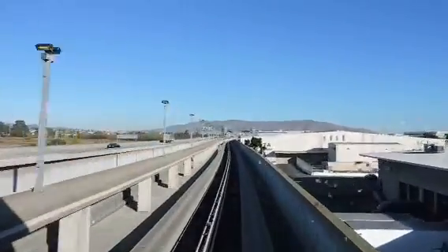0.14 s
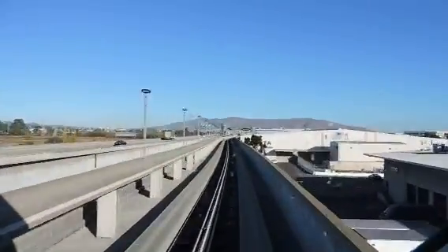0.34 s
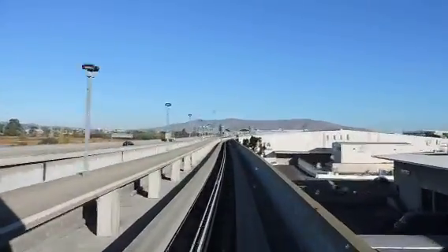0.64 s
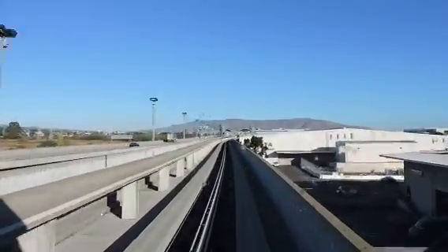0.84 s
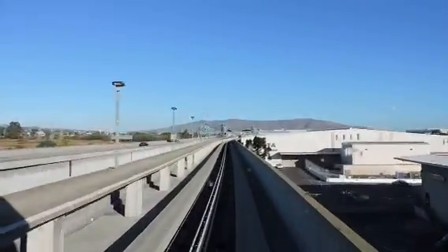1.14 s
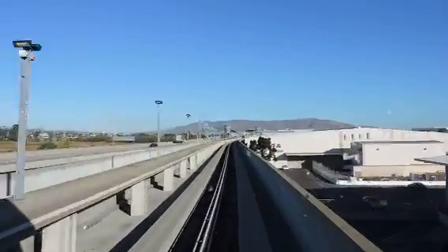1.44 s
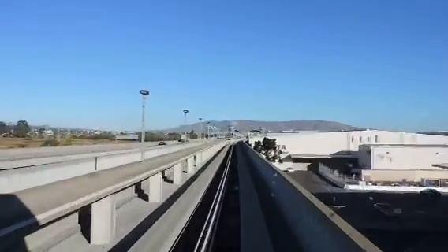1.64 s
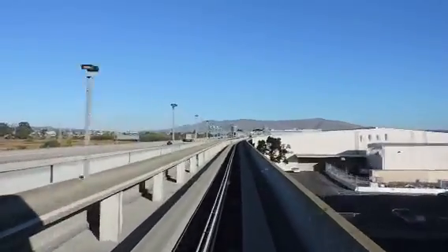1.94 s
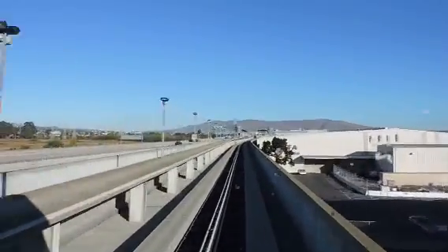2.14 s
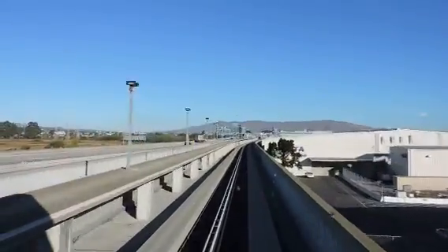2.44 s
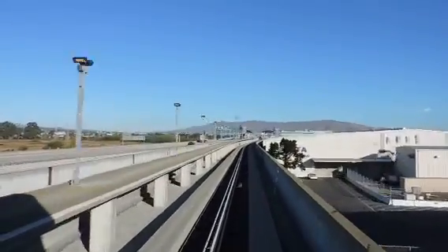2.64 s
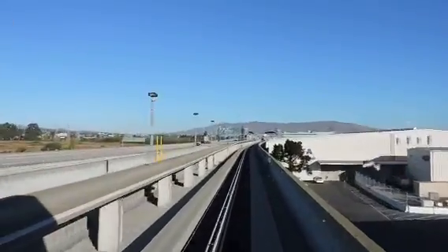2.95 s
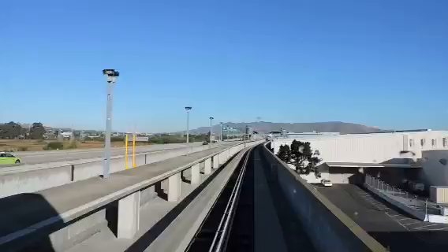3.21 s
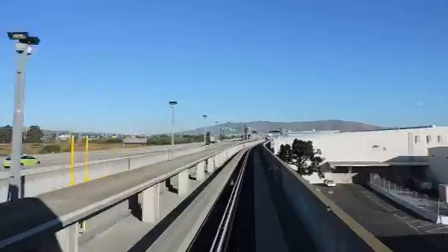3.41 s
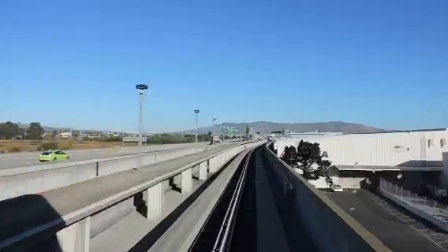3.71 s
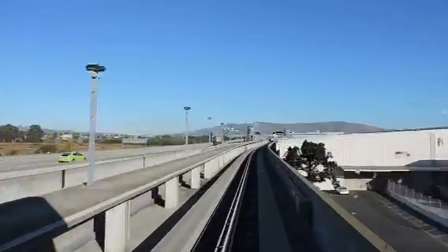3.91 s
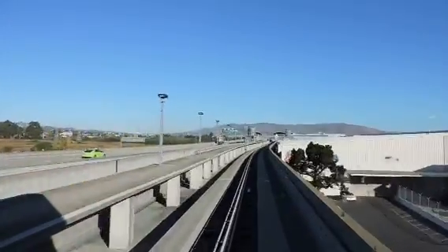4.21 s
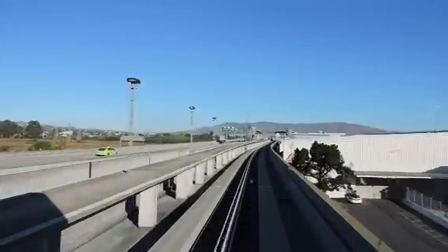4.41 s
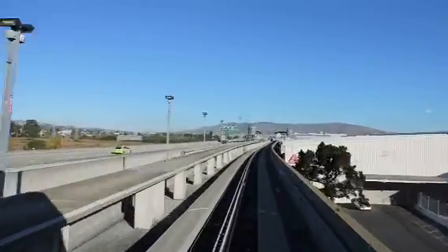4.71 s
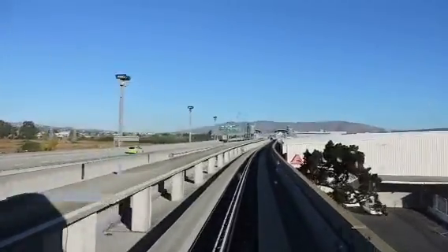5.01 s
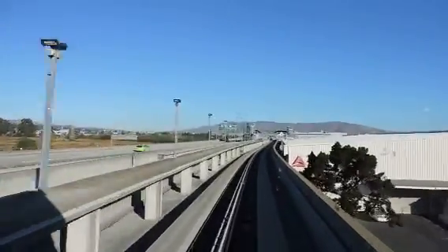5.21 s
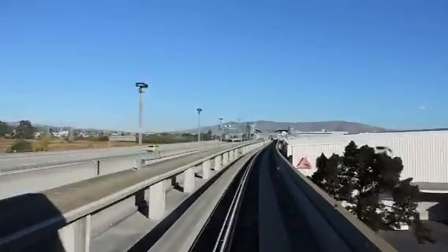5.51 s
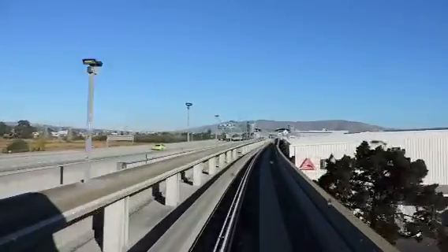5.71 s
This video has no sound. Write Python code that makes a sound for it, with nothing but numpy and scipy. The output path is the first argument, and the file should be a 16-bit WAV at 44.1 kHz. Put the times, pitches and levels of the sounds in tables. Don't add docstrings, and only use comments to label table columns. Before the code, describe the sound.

Heard inside a moving automated car on a concrete guideway: a steady bassy rumble with irregular bumps, floor drone and soft tyre roar. A small fitting clicks early on. From about two seconds a mid-pitched motor whine emerges, wavering and briefly dropping out. A hard knock lands near four seconds, another near four and a half. Stereo microphone in the cabin, bass fuller on the left, treble diffuse.

```python
import sys
import numpy as np
from scipy import signal
from scipy.fft import rfft, irfft, next_fast_len
from scipy.io import wavfile
from scipy.ndimage import uniform_filter1d

SR = 44100
rng = np.random.default_rng(int(sys.argv[2]) if len(sys.argv) > 2 else 0)


def to_wav(sig):
    pcm = np.clip(np.atleast_2d(sig), -1, 1) * 32767
    pcm = np.round(pcm).astype(np.int16)
    wavfile.write(sys.argv[1], SR, pcm.T)


def rack_gain(trim_db):
    fader = np.asarray(trim_db, float)
    return 10 ** (fader / 20)


N = 258413
MEAN_ROUGH_DB = -41
CONTACT_S = 0.001
STRUCK_LIKENESS = 0.3


def rms_one(x):
    return x / np.sqrt(np.mean(x ** 2) + 1e-20)


def in_time(rows):
    s, *columns = np.transpose(rows)
    return [np.interp(np.arange(N) / SR, s, c) for c in columns]


def at_hz(points, hz):
    point_hz, point_db = np.transpose(points)
    return np.interp(np.log(hz), np.log(point_hz), point_db)


def sides(pan_db):
    return rack_gain(np.array([pan_db / 2, -pan_db / 2]))


def drift(rate_hz):
    pole = np.exp(-80 * np.pi * rate_hz / SR)
    noise = rng.standard_normal(N // 40 + 2002)
    slow = signal.lfilter([1], [1, -2 * pole, pole * pole], noise)[2000:]
    return np.interp(np.arange(N) / 40, np.arange(len(slow)), rms_one(slow))


def swells(rows, width_s=None):
    t = np.arange(0, N / SR + .004, .002)
    rise_db = np.zeros(len(t))
    for s, peak_db, *own_s in rows:
        bell_s = own_s[0] if own_s else width_s
        rise_db += peak_db * np.exp(-((t - s) / bell_s) ** 2)
    return np.interp(np.arange(N) / SR, t, rise_db)


def cabin_noise(spectrum, shared_db, own_db, rate_hz, count):
    # (frequency [Hz], left-right likeness [-1..1])
    likeness = [(20, 1), (130, 1), (290, 0.94), (640, 0.89), (1410, 0.61), (3100, 0.1), (6820, -0.074),
                (15000, -0.15)]
    # (frequency [Hz], left-right difference [dB])
    lean = [(60, 2.5), (300, 0.3), (700, 2.5), (1400, 0.5), (4400, 1.4), (9000, 1), (15000, 0.5)]
    size = next_fast_len(N)
    hz = np.maximum(np.arange(size // 2 + 1) * SR / size, 1)
    mid, side = rfft(rng.standard_normal((2, size)))
    alike = np.clip(at_hz(likeness, hz), -1, 1)
    mid = np.sqrt(1 + alike) * mid
    side = np.sqrt(1 - alike) * side
    pair = np.array([mid + side, mid - side])
    pair = pair * rack_gain(at_hz(spectrum, hz)) * sides(at_hz(lean, hz))
    low_hz, high_hz = spectrum[0][0], spectrum[-1][0]
    place = np.log(hz / low_hz) / np.log(high_hz / low_hz) * count
    pair = pair * ((place > 0) & (place < count))
    together, out = drift(rate_hz), 0
    for k in range(count + 1):
        band = irfft(pair * np.clip(1 - abs(place - k), 0, 1), size)[:, :N]
        out = out + band * rack_gain(shared_db * together + own_db * drift(rate_hz))
    return out / np.sqrt(np.mean(out.mean(0) ** 2))


def evened(x, span_s):
    size = round(span_s * SR)
    power = uniform_filter1d(x.mean(0) ** 2, size=size)
    return x / np.sqrt(uniform_filter1d(power, size=size) + 0.021)


def tone(phase, wobble_db, blur_rad, lead_rad=0.0, spread_rad=0.49):
    common = phase + blur_rad * drift(7.6)
    apart = lead_rad + spread_rad * drift(1.16)
    return np.sqrt(2) * np.sin([common + apart / 2, common - apart / 2]) * rack_gain(wobble_db * drift(45.0))


def ride():
    # (time [s], level [dB])
    rough = [(0, -35), (.3, -40.5), (.75, -38.5), (1.15, -42), (1.45, -38.5), (1.8, -41.5), (2.4, -41),
             (2.7, -39.5), (3.2, -40.5), (3.45, -40.5), (4.2, -40.5), (4.75, -41), (4.95, -37), (5.55, -38),
             (5.86, -39.5)]
    # (time [s], low shell [dB], upper shell [dB], floor [dB], rattle [dB])
    jolts = [(.02, -2, 5, -3, 0.5), (.12, -2, -4, -1.5, 2), (.22, 3, 2.5, -0.5, 2), (.45, 6, 7.5, 0, 2),
             (.68, 9, 5, 2, 5), (.8, 6, 6.5, 0.5, 3), (.96, -8, 4.5, -3, 0.5), (1.09, 7.5, 6.5, -1.5, 3),
             (1.22, 4.5, -0.5, -2, 1), (1.33, -1, 7, 1.5, 4), (1.42, -6, 7.5, 0.5, 4),
             (1.57, 1, 8.5, -0.5, 3.5), (1.7, 6, 2, -1.5, 0.5), (1.8, -0.5, 3, -1.5, 1.5),
             (1.92, 3, 1, -0.5, 2.5), (2.07, 7, 5, 1, 0.5), (2.3, 0.5, 3.5, -0.6, 0),
             (2.47, 3, 6, -0.5, -1.5), (2.6, 0, 7, 1.5, 2), (2.679, 6, 4.5, 0, 2), (2.88, -2, -2, 0, 1),
             (3.08, 6, 4.5, 1.5, 3.5), (3.19, 5, 7.5, 2.5, 2.5), (3.3, -5, 4, 0, 2), (3.53, -9, 9, 0, 2),
             (3.66, -6, -3, -0.5, 0), (3.75, -1, 3.5, 2, 9), (3.989, -4, 6, 3, 5),
             (4.14, 5, -0.5, -0.2, 1.5), (4.38, 10, 6, 3.5, 6), (4.56, -4, -7, 0, -0.5),
             (4.852, 6, 0, 1.5, 0.5), (5.0, 8, 0.5, 0, 4), (5.15, 5, 3.5, -0.5, 0.5), (5.3, 9.5, -1, -1, 2),
             (5.6, 7, 5, 0, 0.5), (5.78, 7, 7, -0.5, -1)]
    widths_s = 0.037, 0.047, 0.048, 0.055
    s, *rises = np.transpose(jolts)
    return in_time(rough)[0] - MEAN_ROUGH_DB, *[swells(zip(s, r), w_s) for r, w_s in zip(rises, widths_s)]


def pitching():
    # (frequency [Hz], density [dB per Hz])
    nod_spectrum = [(20, -19), (26, -1), (32, 1), (37, -6.5), (43, -28)]
    return rack_gain(-35) * evened(cabin_noise(nod_spectrum, .3, .3, 4.0, count=1), .12)


def sway():
    # (frequency [Hz], density [dB per Hz])
    sway_spectrum = [(6, -1), (14, -1), (22, -4), (27, -7), (33, -8), (38, -17), (42, -18)]
    # (time [s], level [dB])
    rocking = [(0, -15), (.2, -19.5), (.55, -22.5), (.88, -13.5), (1.1, -25), (1.55, -15), (1.75, -25.5),
               (1.92, -17.5), (2.3, -22), (2.5, -23), (3.2, -19.5), (3.95, -22.5), (4.4, -23.5), (4.6, -26),
               (5.1, -25.5), (5.45, -29.5), (5.7, -14), (5.86, -32)]
    return rack_gain(in_time(rocking)[0]) * evened(cabin_noise(sway_spectrum, 0.26, .3, 3.9, count=1), 0.71)


def trim_hiss(rough_db, rattle_db):
    # (frequency [Hz], density [dB per Hz])
    hiss_spectrum = [(2650, -1.5), (4500, -4), (5800, -7.5), (7830, -10), (9870, -12), (13800, -15),
                     (15100, -18), (15900, -21)]
    level_db = -65.5 + 0.4 * rough_db + rattle_db
    return rack_gain(level_db) * evened(cabin_noise(hiss_spectrum, 0.98, .6, 30.0, count=3), 0.11)


def floor_drone(rough_db, floor_db):
    # (frequency [Hz], density [dB per Hz])
    drone_spectrum = [(97, -54), (165, -10), (200, -11), (237, -5), (313, -8.5), (338, -13), (371, -9),
                      (398, -19), (430, -13.5), (455, -16), (489, -6), (521, -16), (544, -13), (900, -21),
                      (1170, -25.5), (1980, -120)]
    level_db = -34 + 0.87 * rough_db + floor_db
    return rack_gain(level_db) * evened(cabin_noise(drone_spectrum, 0.37, 1.9, 37.0, count=4), 0.1)


def tyre_roar(rough_db, floor_db):
    # (frequency [Hz], density [dB per Hz])
    roar_spectrum = [(500, -6), (850, -7.5), (905, -13), (960, -5.5), (1150, -2.5), (1310, -6),
                     (1740, -9.5), (2360, -20), (3240, -24), (3480, -23), (3640, -26), (6500, -45.5),
                     (8450, -73), (14300, -120)]
    level_db = MEAN_ROUGH_DB + rough_db + 0.78 * floor_db
    return rack_gain(level_db) * evened(cabin_noise(roar_spectrum, 0.91, 0.36, 22.0, count=3), 0.17)


def shell_boom(rough_db, shell_db, upper_db):
    # (frequency [Hz], density [dB per Hz])
    boom_spectrum = [(22, -19), (32, -14.5), (42, -12.5), (52, 1.5), (61, 0), (75, -2.5), (88, -4),
                     (105, -13.5), (125, -41)]
    # (frequency [Hz], density [dB per Hz])
    thump_spectrum = [(65, -48), (80, -5), (95, 0), (118, 4), (140, -4.5), (165, -25), (210, -66)]
    boom_db = -28.5 + 0.35 * rough_db + shell_db
    thump_db = -30.5 + 0.33 * rough_db + upper_db
    boom = rack_gain(boom_db) * evened(cabin_noise(boom_spectrum, 0.2, 0.43, 5.5, count=1), 0.043)
    thump = rack_gain(thump_db) * evened(cabin_noise(thump_spectrum, 0.31, 0.24, 7.8, count=1), 0.068)
    return boom + thump


def squeaks():
    # (time [s], length [s], pitch [Hz], level [dB], overtone [dB])
    slips = [
        (1.562, .028, 3180, -52, -15),
        (1.588, .024, 3180, -50, -22),
        (1.61, .025, 3180, -60, -24),
        (1.96, .015, 8400, -66, -40),
        (3.666, .06, 13500, -61, -40),
        (3.68, .025, 12250, -67, -40),
        (4.341, .018, 11500, -59, -40),
        (4.345, .02, 14400, -69, -40),
    ]
    out = np.zeros((2, N))
    for s, length_s, pitch_hz, level_db, overtone_db in slips:
        t = np.arange(round(length_s * SR)) / SR
        beat_db = 2.0 * np.sin(2 * np.pi * 110 * t)
        shape = np.sin(np.pi * (t / length_s) ** .6) * rack_gain(level_db + beat_db)
        steps = rng.standard_normal((2, round(.06 * SR)))
        wander = np.cumsum(steps, axis=1)[:, :len(t)] * .05 * (pitch_hz / 9000) ** 2
        phase = 2 * np.pi * pitch_hz * t + wander
        overtones = rack_gain(overtone_db) * (np.sin(2 * phase) + .15 * np.sin(3 * phase))
        sound = np.sin(phase) + (pitch_hz < SR / 8) * overtones
        at = round(s * SR)
        out[:, at:at + len(t)] += np.sqrt(2) * sound * shape
    return out


def ticks():
    # (frequency [Hz], density [dB per Hz])
    crack_spectrum = [(1000, -3), (1800, -2), (3000, -5), (4800, -4), (6500, -5), (8500, -1.5), (12000, 0),
                      (14000, -2), (15200, -7), (16000, -16)]
    # (time [s], peak [dB], decay [s], left-right [dB], thud below 5 kHz [dB])
    fittings = [(0.0015, -57, 0.0089, -2, 5), (0.641, -39, 0.012, -4, 10), (0.6818, -52, 0.008, -2, -4),
                (0.6865, -54, 0.01, -3, -8), (0.696, -58, .01, 0, 4), (0.756, -58, .01, 0, 3),
                (0.8844, -59, 0.03, 1, 2), (1.8677, -62, 0.01, 1.0, 0.1), (2.5666, -60, .01, 0, 10),
                (2.65, -59, .012, 0, 10), (2.685, -61, 0.0072, 0, 4), (3.014, -64, .01, -2, 10),
                (3.283, -58, 0.04, -2, 0), (3.291, -58, .04, 0, 7), (3.734, -62, 0.02, 1, 4),
                (3.9745, -42.5, 0.004, -7, -9), (3.9748, -36, 0.003, -9, 4.5), (3.9759, -44, .004, -6, 0),
                (4.0036, -54, 0.01, 1, 5), (4.0065, -53, .01, 0, -3), (4.287, -54, 0.014, 4, 5),
                (4.6240, -38, 0.003, -6, 0), (4.6253, -49, .005, -6, 0), (4.665, -54, 0.01, 0, 9),
                (5.3178, -58, .01, 2, 4)]
    thud_late_s, thud_longer, thud_below_hz = 0.001, 1.8, 5000
    tail_db, tail_s, rise_s = -17, 0.16, 0.00013
    t, out = np.arange(round(.08 * SR)) / SR, np.zeros((2, N))
    hz = np.maximum(np.arange(len(t) // 2 + 1) * SR / len(t), 1)
    low = 1 / (1 + (hz / thud_below_hz) ** 4)
    for s, peak_db, t60_s, pan_db, thud_db in fittings:
        tilt_db = 0.7 * thud_db * np.clip(np.log2(7000 / hz), 0, 2.2)
        colour = rack_gain(at_hz(crack_spectrum, hz) + tilt_db) * (hz > 900)
        noise = rfft(rng.standard_normal((2, len(t)))) * colour
        noise = noise + STRUCK_LIKENESS * noise[::-1]
        gain = rack_gain(peak_db - 0.5) / np.std(irfft(noise, len(t)))
        at = round(s * SR)
        for part, late_s, longer in ((1 - low, 0, 1), (low, thud_late_s, thud_longer)):
            since = np.maximum(t - late_s, 0)
            fall = rack_gain(-60 * np.maximum(since - CONTACT_S, 0) / max(t60_s * longer, .002))
            tail = rack_gain(tail_db - 60 * t / tail_s)
            shape = np.minimum(since / rise_s, 1) * (fall + tail)
            out[:, at:at + len(t)] += gain * irfft(noise * part, len(t)) * shape * sides(pan_db)[:, None]
    return out


def knocks():
    # (time [s], peak [dB], decay [s], centre [Hz], width [octaves])
    puffs = [(.683, -44, .02, 1500, .5), (2.949, -47, .02, 4600, .45), (2.96, -59, .04, 7500, .5),
             (3.07, -60, .03, 5500, .6), (3.188, -44, .02, 900, .6), (3.283, -46, .03, 3460, .45),
             (3.283, -57, .03, 15000, .2), (3.733, -50, .02, 7800, .4), (3.734, -37, .02, 2222, 0.31),
             (3.9746, -40, .005, 8200, .25), (3.9748, -23, 0.0054, 1900, 0.69), (3.979, -42, .01, 2800, .4),
             (4.022, -28, .015, 800, 0.43), (4.345, -52, .02, 4800, .5), (4.461, -35, .02, 800, .5),
             (4.6257, -39, .005, 4400, .25), (4.6265, -35, .006, 2300, .35), (4.628, -45, .006, 6500, .4),
             (4.6243, -39, 0.0055, 12000, .15), (3.9745, -31, 0.014, 1600, .5),
             (3.9748, -43, .004, 13000, .25), (4.626, -29, .012, 1574, .45), (4.6243, -45, .004, 8900, .15),
             (3.292, -52, .03, 3240, .4), (3.06, -55, .015, 4800, .4), (3.55, -60, .05, 8000, .6),
             (3.975, -22, .05, 220, 0.55)]
    t, out = np.arange(round(.05 * SR)) / SR, np.zeros((2, N))
    hz = np.maximum(np.arange(len(t) // 2 + 1) * SR / len(t), 1)
    for s, peak_db, t60_s, centre_hz, octaves in puffs:
        noise = rfft(rng.standard_normal((2, len(t))))
        noise = noise + STRUCK_LIKENESS * noise[::-1]
        puff = irfft(noise * np.exp(-(np.log2(hz / centre_hz) / octaves) ** 2), len(t))
        fall_db = -60 * np.maximum(t - CONTACT_S, 0) / max(t60_s, .003)
        shape = np.minimum(t * centre_hz, 1) * rack_gain(peak_db - 3.5 + fall_db)
        at = round(s * SR)
        out[:, at:at + len(t)] += rms_one(puff) * shape
    return out


def panel_hum():
    # (time [s], rise [dB])
    buzzes = [(.74, 15), (2.6, 6), (3.2, 14), (3.72, 13), (3.97, 9), (4.42, 8), (4.55, 7), (4.69, 20),
              (4.87, 23), (5.09, 25.5), (5.24, 15), (5.32, 22.5), (5.4, 10), (5.47, 19.5), (5.54, 22.5),
              (5.63, 17.5), (5.72, 21), (5.82, 10.5)]
    panel_hz, panel_width_hz = 488, 14
    level_db = -56.5 + swells(buzzes, width_s=0.05)
    phase = 2 * np.pi * panel_hz * np.arange(N) / SR + 0.025 * panel_width_hz * drift(10.0)
    return rack_gain(level_db) * tone(phase, .8, 0.4) * sides(1.3)[:, None]


def shaft_phase():
    # (time [s], rate [turns per s])
    speed = [(0, 62.85), (.65, 62.6), (1.45, 61.9), (2.5, 61.65), (3.05, 61.75), (3.85, 62.1),
             (4.65, 62.45), (5.45, 62.8), (5.86, 62.95)]
    return 2 * np.pi * np.cumsum(in_time(speed)[0]) / SR


def shaft_hum(angle):
    # (time [s], rise [dB])
    throbs = [(.05, 4), (.3, 14), (.55, 14), (.78, 11), (1.09, 6), (1.5, 9), (1.67, 3), (1.9, 14),
              (2.06, 1), (2.28, 2), (2.64, 16), (3.2, 15), (3.51, 9), (3.8, 13), (4.0, 17), (4.25, -8),
              (4.5, 7), (4.87, 0), (5.0, 23), (5.3, 15), (5.46, 19), (5.66, 17)]
    # (time [s], rise [dB])
    surges = [(.12, 20.5), (.36, 16), (.72, 15), (.85, 10), (1.33, 18.5), (1.42, 7), (1.55, 12), (2.13, 19),
              (2.35, 12.5), (2.58, 17.5), (2.7, 13.5), (2.93, 11.5), (3.15, 11.5), (3.75, -7), (3.97, 19.5),
              (4.05, 13.5), (4.32, -1), (4.6, 8), (4.9, 14), (5.18, 18.5), (5.3, 11), (5.42, 18),
              (5.58, 20), (5.76, 19.5)]
    # (shaft multiple, level [dB])
    steady_lines = [(2, -39.5), (6, -54.5), (152, -87.5)]
    out = rack_gain(-39.5 + swells(throbs, width_s=0.09)) * tone(angle, 0.21, 0.064, spread_rad=.15)
    out += rack_gain(-52 + swells(surges, width_s=0.051)) * tone(4 * angle, 2.1, 0.92, spread_rad=.3)
    for order, level_db in steady_lines:
        out += rack_gain(level_db) * tone(round(order) * angle, 4.6, 0.037 * order ** 0.49 + 0.64)
    return out


def motor_whine(angle):
    # (time [s], level [dB])
    load = [(0, -49.5), (2.0, -62), (2.12, -42.5), (2.55, -37.5), (2.59, -32.5), (3.1, -31), (3.3, -34),
            (3.5, -34.5), (3.62, -37.5), (3.8, -35), (4.22, -35), (4.29, -32.5), (4.41, -25.5),
            (4.45, -40.5), (4.8, -35.5), (4.88, -38), (4.96, -25), (5.07, -36), (5.25, -33), (5.4, -27),
            (5.65, -28), (5.74, -34), (5.86, -32)]
    # (time [s], depth [dB], half width [s])
    nulls = [(2.28, -22, 0.039), (2.5, -10, 0.046), (2.713, -25, 0.02), (2.915, -8.5, 0.042),
             (3.11, -6, 0.028), (3.17, -13, 0.0079), (3.36, -6, 0.088), (3.44, -7, 0.023),
             (3.545, -7, .014), (3.65, 0, 0.022), (3.86, -3, 0.03), (3.97, -15, 0.022), (4.03, -8, 0.016),
             (4.14, -12, 0.0083), (4.25, -6, 0.016), (4.32, -7, 0.015), (4.37, -16, 0.01),
             (4.445, -22, 0.013), (4.52, -3, 0.027), (4.74, -10, 0.021), (4.865, -3, 0.016),
             (5.045, -4, 0.017), (5.3, -26, 0.025), (5.465, -16, 0.018)]
    # (time [s], rise [dB])
    second_swells = [(2.13, 24.5), (2.35, 20), (2.58, 27), (2.75, 14), (2.88, 11), (3.03, 17.5), (3.22, 18),
                     (3.35, 13), (3.48, 15), (3.62, 21.5), (3.8, 14), (4.15, 20), (4.38, 19), (4.55, 11),
                     (4.95, 9), (5.1, 5)]
    whine_db = in_time(load)[0] + swells(nulls)
    upper_db = -51 + 0.47 * (whine_db + 38)
    second_db = -64 + swells(second_swells, width_s=0.11)
    coast_db = -46 - 5.0 * np.arange(N) / SR
    out = rack_gain(whine_db) * tone(11 * angle, 1.2, 0.4, lead_rad=.5)
    out += rack_gain(upper_db) * tone(13 * angle, 4.0, 1.0)
    out += rack_gain(second_db) * tone(9 * angle, 1.0, 0.24)
    out += rack_gain(coast_db) * tone(19 * angle, 3.0, 1.5)
    return out


def scene():
    rough_db, shell_db, upper_db, floor_db, rattle_db = ride()
    angle = shaft_phase()
    body = pitching() + sway() + shell_boom(rough_db, shell_db, upper_db)
    rolling = trim_hiss(rough_db, rattle_db) + floor_drone(rough_db, floor_db) + tyre_roar(rough_db, floor_db)
    loose = squeaks() + ticks() + knocks()
    drive = panel_hum() + shaft_hum(angle) + motor_whine(angle)
    return body + rolling + loose + drive


def roll_off(x):
    return signal.sosfilt(signal.butter(12, 15790, fs=SR, output="sos"), x)


def record(dry):
    port_hz = np.array([16.6, 53.5])
    left_pole, right_pole = np.exp(-2 * np.pi * port_hz / SR)
    right = signal.lfilter([1, -left_pole], [1, -right_pole], dry[1])
    top_cut = signal.ellip(10, .3, 45, 15760, fs=SR, output="sos")
    mix = signal.sosfilt(top_cut, np.array([dry[0], right]))
    return roll_off(mix)


dry = scene()
out = record(dry)
to_wav(out)
```